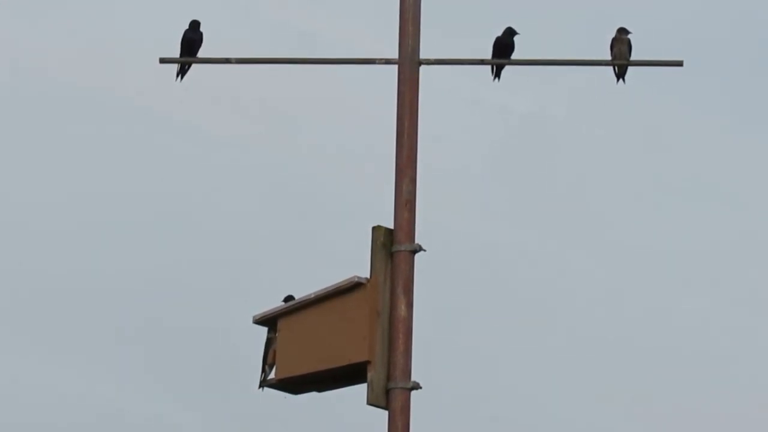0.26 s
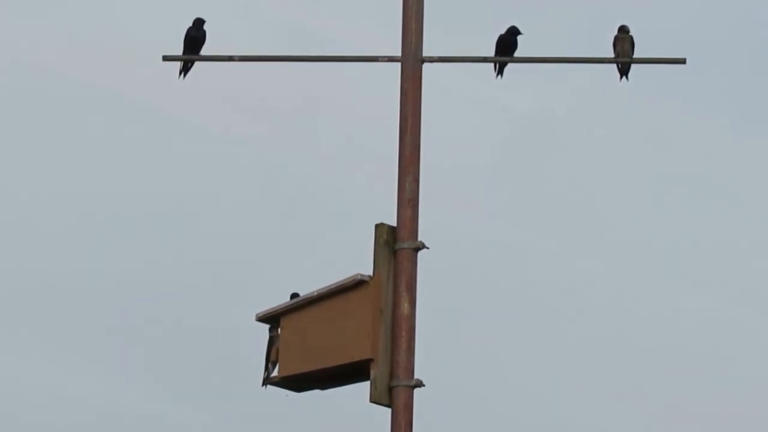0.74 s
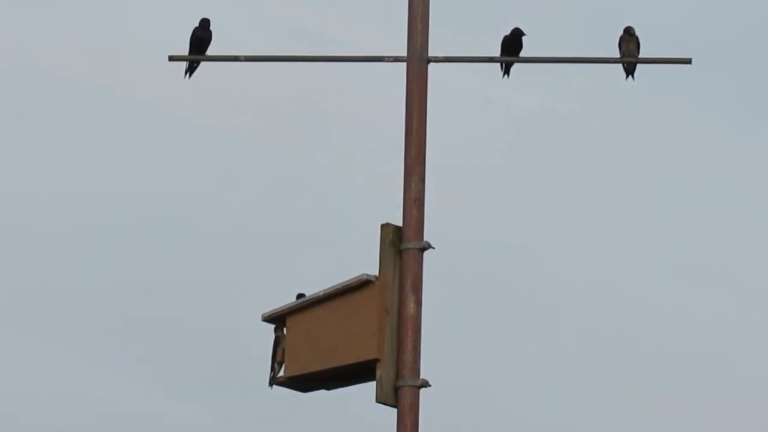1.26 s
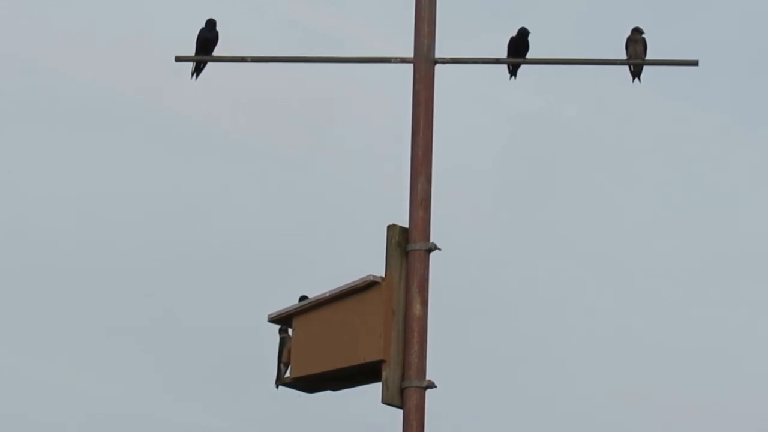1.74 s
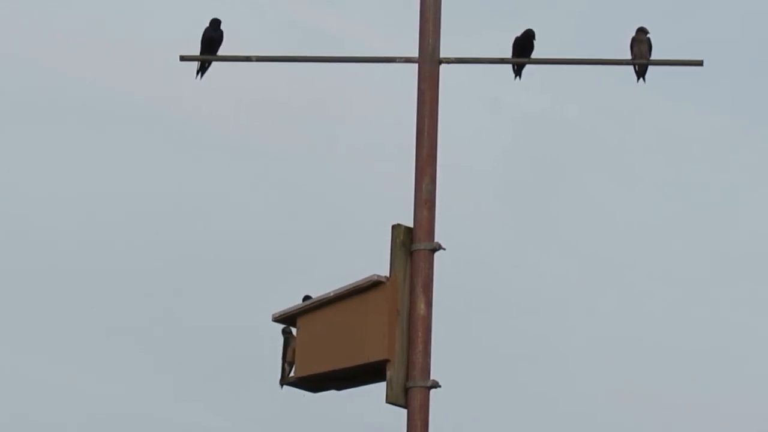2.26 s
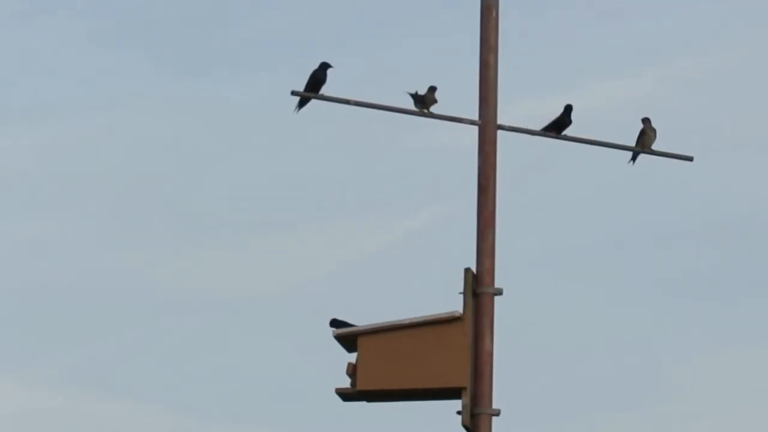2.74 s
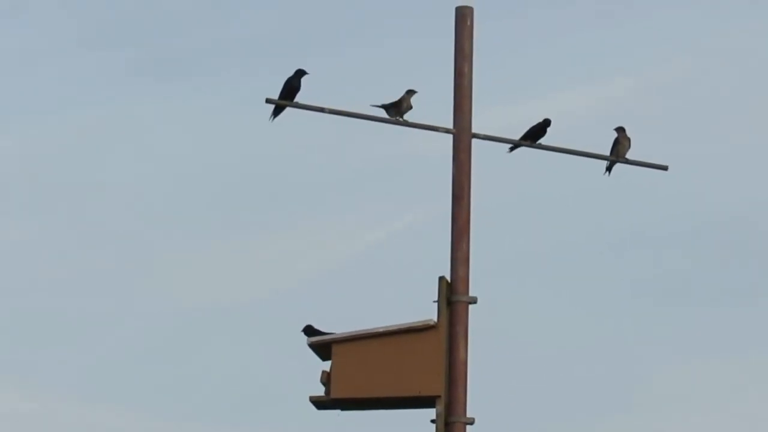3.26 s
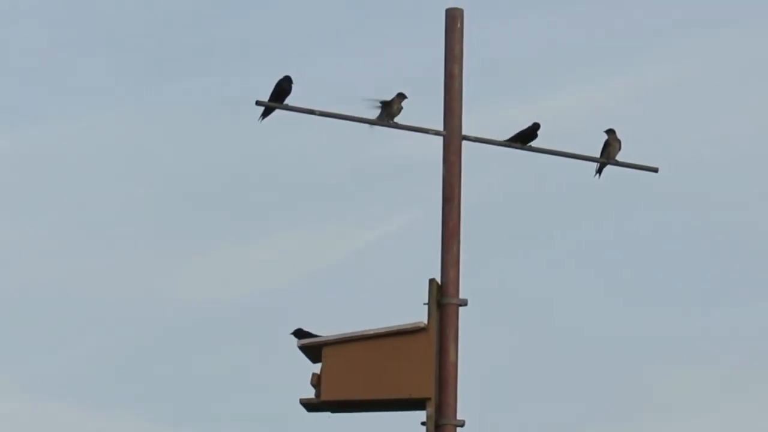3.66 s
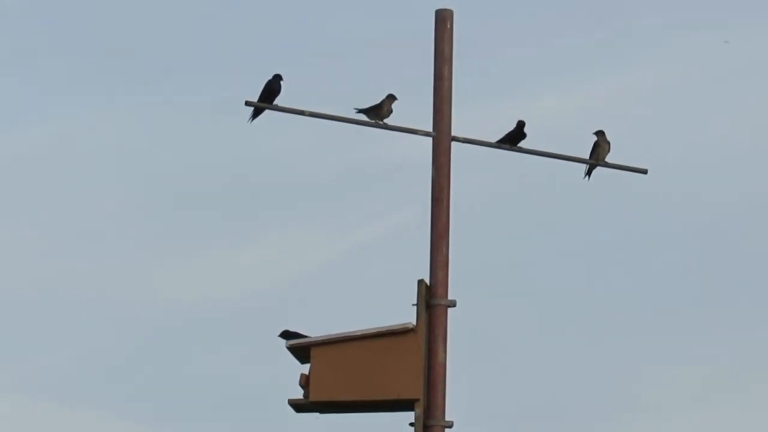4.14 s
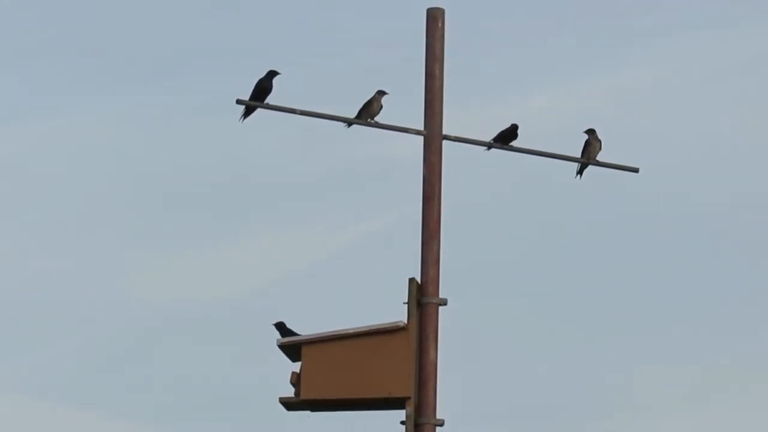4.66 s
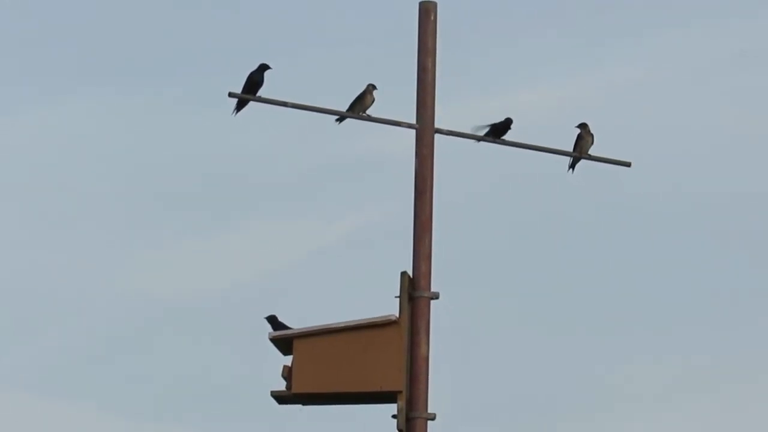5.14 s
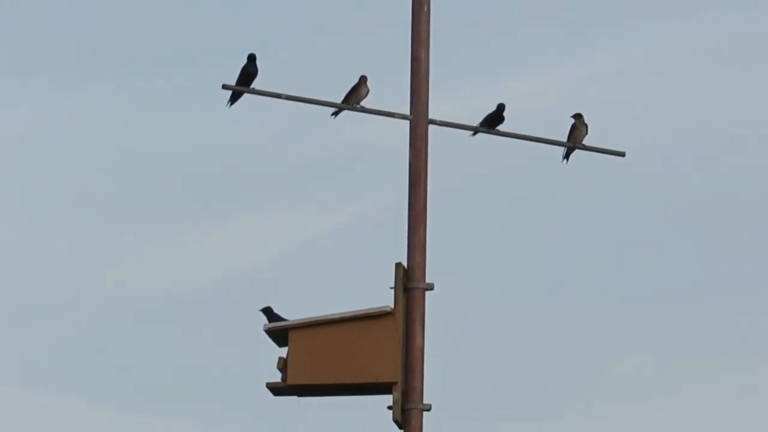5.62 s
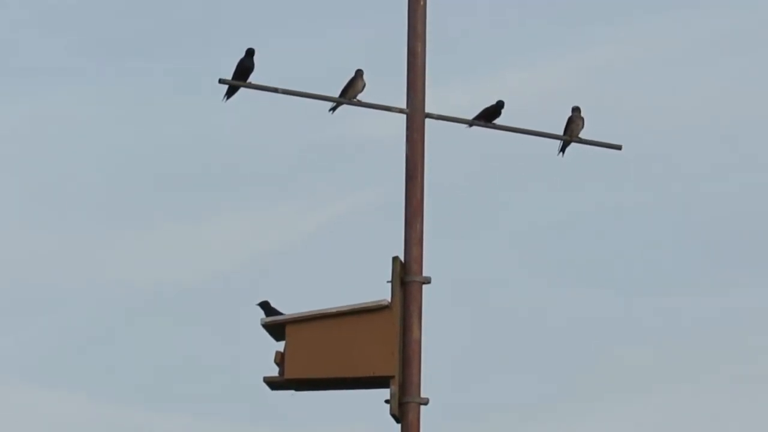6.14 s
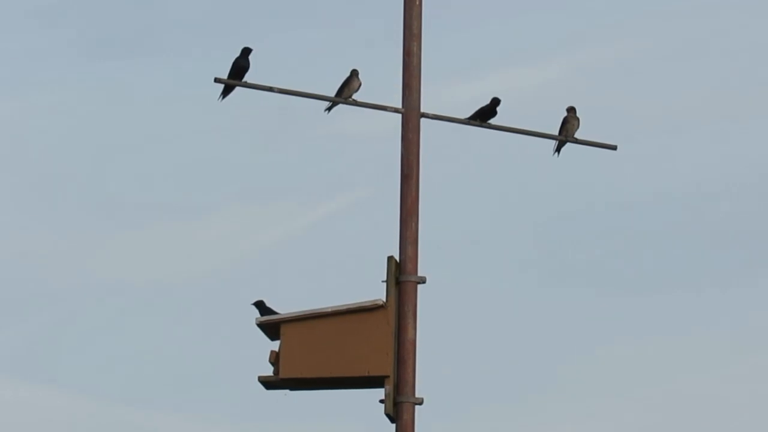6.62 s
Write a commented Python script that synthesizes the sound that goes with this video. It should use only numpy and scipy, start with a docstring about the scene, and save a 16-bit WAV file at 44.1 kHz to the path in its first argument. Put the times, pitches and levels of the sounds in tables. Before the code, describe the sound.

Scattered distant chirps give way to close, buzzy bird chatter and trills, with soft wind and a low drone behind.

```python
"""A colony of martins, each singing a near-sine tone from its syrinx. Wind and a distant drone sound from
the start, with the glides, whistles, twitter and ticks of farther birds. At 2.3 s all sound drops out
briefly. Then near birds on a perch churr in fast falling glides and trill, air hissing through their beaks.
From 3.5 s the colony grows busier with squeaks, rattles, arched calls and chips, and last with rough
falling slides. Ground, boxes and trees reflect the calls as short diffuse tails."""
import sys
import numpy as np
from scipy import signal
from scipy.fft import rfft, irfft, next_fast_len
from scipy.io import wavfile
from scipy.ndimage import uniform_filter1d, map_coordinates

SR = 44100
rng = np.random.default_rng(int(sys.argv[2]) if len(sys.argv) > 2 else 0)


def master(y):
    """Save y as 16-bit WAV."""
    cut = np.clip(np.atleast_2d(y).T, -1, 1)
    pcm = np.round(cut * 32767)  # scale
    wavfile.write(sys.argv[1], SR, pcm.astype(np.int16))


N = 303849
TOP_HZ, NEAR_DB = 15790, -40  # band limit; level above which a glide counts as near


def amp(db):
    """Amplitude ratio of a level in decibels."""
    return 10 ** (np.asarray(db) / 20)


def unit(x):
    """Normalisation to an rms of 1."""
    return x / np.sqrt(np.mean(x ** 2) + 1e-20)


def along(points, hz):
    """Interpolation of (Hz, value) points on a logarithmic frequency axis."""
    knots_hz, values = np.transpose(points)
    return np.interp(np.log(hz + 1), np.log(knots_hz + 1), values)


def wobble(rate, size=N):
    """Band-limited random modulation: a spline over `rate` knots a second."""
    knots = rng.standard_normal(int(size * rate / SR) + 4)
    return map_coordinates(knots, [np.arange(size) * rate / SR], prefilter=False) * np.sqrt(2)


def filtered(x, response):
    """Linear filtering: the spectrum is multiplied by a frequency response."""
    size = next_fast_len(N + 8192)
    return irfft(rfft(x, size) * response(np.fft.rfftfreq(size, 1 / SR)), size)[..., :N]


def add(out, s, sound, pan_db=0):
    """Superposition from second s; pan is the level difference, left minus right."""
    start = max(round(s * SR), 0)
    part = sound[:N - start]
    out[:, start:start + len(part)] += part * amp([[pan_db / 2], [-pan_db / 2]])


def contours(rows):
    """Linear interpolation of a note's breakpoints, and an envelope that softens both ends."""
    s, *columns = np.transpose(rows)
    t = np.arange(s[0], s[-1], 1 / SR)
    edge = np.clip(np.minimum(t - s[0], s[-1] - t) / 0.0014, 0, 1)
    return [np.interp(t, s, column) for column in columns], edge


def noise(spectrum, patchy_db):
    """Partly coherent stereo noise of rms 1, its gain uneven over time and frequency."""
    # Likeness of the channels. Each row: frequency in Hz, left-right correlation.
    coherence = [(60, 0.79), (240, 0.5), (950, -0.11), (3770, -0.18), (15000, 0.14)]

    def mid_side_response(hz):
        """The ratio of mid to side sets the correlation."""
        angle = np.arccos(np.clip(along(coherence, hz), -1, 1)) / 2
        return amp(along(spectrum, hz)) * [np.cos(angle), np.sin(angle)]

    cells = signal.stft(rng.standard_normal((2, N)), nperseg=512)[2]
    patches = uniform_filter1d(uniform_filter1d(rng.standard_normal(cells.shape[1:]), 6, 0), 12, 1)
    pair = signal.istft(cells * amp(patchy_db * unit(patches)), nperseg=512)[1][:, :N]
    mid, side = filtered(pair, mid_side_response)
    return unit(np.array([mid + side, mid - side]))


def wind():
    """Turbulence: three bands of noise, amplitude-modulated by the same gusts."""
    # Wind strength. Each row: time in seconds, then rumble, rush and hiss levels in dB.
    strength = [(0, -53, -53, -58), (.8, -52.5, -52.5, -59.5), (1.5, -52.5, -53.5, -59.5),
                (2.15, -50.5, -51, -58.5), (2.27, -57.5, -45, -51), (2.4, -56.5, -57.5, -62.5),
                (3, -52.5, -55, -61.5), (3.8, -49, -52, -56.5), (4.6, -50, -52.5, -58),
                (5.4, -49.5, -51.5, -57.5), (6.1, -49, -52, -58.5), (6.89, -49, -52.5, -59.5)]
    # Spectra of the three bands. Each row: frequency in Hz, relative spectral density in dB.
    rumble = [(12, -65.5), (20, -29.5), (61, -3.5), (76, -1.5), (91, -1.5), (129, -9.5), (184, -6.5),
              (214, -16.5), (323, -8.5), (400, -13.5), (520, -26), (880, -120)]
    rush = [(120, -65), (200, -3.5), (318, -5.5), (442, -8), (546, 0), (816, -10.5), (1020, -9),
            (1110, -12.5), (1860, -19.5), (2500, -18), (3250, -29.5), (5500, -120)]
    hiss = [(710, -19), (1200, -7), (1860, -2.5), (3010, -1), (3680, -4), (11900, -16), (15400, -20.5)]
    s, *levels = np.transpose(strength)
    rumble_db, rush_db, hiss_db = [np.interp(np.arange(N) / SR, s, db) for db in levels]
    gust = wobble(8)
    out = amp(rumble_db + 1.2 * gust + .8 * wobble(12)) * noise(rumble, patchy_db=1.5)
    out += amp(rush_db + 0.79 * gust) * noise(rush, patchy_db=0.5)
    return out + amp(hiss_db + 0.25 * gust) * noise(hiss, patchy_db=-0.7)


def drone():
    """Narrow-band noise: neighbouring frequencies beat, so the distant hum wavers."""
    # Bands of the hum. Each row: centre in Hz, width in Hz, rms level in dB.
    bands = [(83.7, 12.8, -57.5), (180.4, 6.6, -66.5)]
    out = np.zeros(N)
    for hz, width, db in bands:
        hum = filtered(rng.standard_normal(N), lambda f: np.exp(-((f - hz) / width) ** 2))
        out += amp(db) * unit(hum)
    return out


def air():
    """A level difference between the channels sets wind and drone slightly to the left."""
    # Balance. Each row: frequency in Hz, pan in dB.
    lean = [(60, 1), (950, 1.5), (15000, 0)]
    return filtered(wind() + drone(), lambda hz: amp(along(lean, hz) * np.array([[.5], [-.5]])))


def syrinx(hz, overtones_db, scatter_db=0, breath=0, swell=1):
    """Source and filter: a near-sine tone whose trembling, breathy harmonics are coloured by the beak."""
    # Response of the beak to the overtones. Each row: frequency in Hz, gain in dB.
    beak = [(2500, 25), (4500, -12.5), (7000, -0.5), (9000, 0.5), (11000, -0.5), (13000, -1), (15500, -6)]
    phase = 2 * np.pi * (np.cumsum(hz) / SR + rng.random())
    voice = swell * np.sin(phase)
    for k, db in enumerate(overtones_db, 2):
        gain = amp(db + along(beak, k * hz) + scatter_db * wobble(144, len(hz))) * (k * hz < TOP_HZ)
        voice += gain * (1 + breath * wobble(1800, len(hz))) * np.sin(k * phase)
    return voice


def whistles(warble_hz=95):
    """Held, slightly unsteady tones of farther birds; frequency modulation makes some warble."""
    # Each row: pan in dB, warble deviation in Hz, breakpoints of time in seconds, pitch in Hz, level in dB.
    notes = [(3, 82, [(0, 2520, -53), (.046, 2650, -50), (.07, 2830, -55)]), (5, 101, [(.11, 1990, -53),
             (.17, 2200, -59), (.234, 2255, -51.5), (.29, 2310, -59)]), (3, 80, [(.78, 2476, -57),
             (.836, 2415, -47), (.88, 2130, -53)]), (8.7, -15, [(.885, 1423, -62), (.98, 1480, -53.5),
             (1.11, 1537, -50.5), (1.135, 1370, -62)]), (9.5, 3, [(.94, 4120, -72), (1.05, 4320, -62.5),
             (1.11, 4210, -68), (1.14, 4460, -65)]), (3.5, 0, [(1.195, 3100, -66), (1.228, 3060, -50.5),
             (1.26, 3140, -56)]), (3, 38, [(1.3, 2990, -55), (1.35, 2830, -54), (1.405, 2734, -46.5),
             (1.42, 2800, -60), (1.46, 2780, -66), (1.55, 2800, -68)]), (5, 0, [(1.8, 2480, -46),
             (1.82, 2213, -49), (1.88, 2245, -62), (1.98, 2190, -66)]), (10, 0, [(1.77, 1454, -60),
             (1.85, 1513, -53.5), (1.905, 1560, -55.5), (1.925, 1380, -62)]), (4, 0, [(1.82, 4150, -67),
             (1.9, 4200, -65), (1.95, 4290, -69)]), (16, 0, [(2.655, 2570, -62), (2.67, 2680, -72),
             (2.74, 2570, -65), (2.88, 2320, -66)]), (.5, 2, [(3.12, 1703, -55), (3.17, 1810, -59.5),
             (3.24, 1890, -58.5), (3.33, 1777, -58.5), (3.43, 1695, -59), (3.52, 1760, -54),
             (3.6, 1883, -52), (3.65, 1930, -54)]), (18, 58, [(5.21, 2690, -57.5), (5.3, 2500, -62),
             (5.43, 2270, -64)]), (10, -2, [(5.94, 2710, -51), (5.99, 2740, -55.5), (6.005, 2800, -74.5)]),
             (9, 0, [(6.13, 4340, -60), (6.17, 4520, -64), (6.24, 4500, -56), (6.255, 4521, -71)]),
             (2, 0, [(6.625, 4484, -65), (6.66, 4140, -73), (6.76, 3940, -67)])]
    out = np.zeros((2, N))
    for pan_db, swing_hz, rows in notes:
        (hz, db), edge = contours(rows)
        size = len(hz)
        warble = np.sin(2 * np.pi * warble_hz * np.arange(size) / SR + wobble(28, size))
        pitch = hz * (1 + .004 * wobble(90, size)) + swing_hz * warble
        voice = syrinx(pitch, [-30], scatter_db=2, breath=.3)
        throb_db = wobble(110, size) + swing_hz / 40 * warble
        add(out, rows[0][0], np.sqrt(2) * amp(db + throb_db) * edge * voice, pan_db)
    return out


def glide(out, s, length, from_hz, to_hz, db, pan_db):
    """A linear frequency sweep centred on second s, under a bell of breath pressure."""
    # Relative levels in dB of harmonics 2, 3, .. before the beak colours them.
    harmonics = [-24, -40, -39, -43, -48, -46]
    size = round(2 * length * SR)
    progress = np.arange(size) / (length * SR) - .5
    bell = np.sin(np.pi * np.clip(progress, 0, 1) ** 1.15) ** 1.4 * amp(.8 * wobble(200, size))
    skirt = amp(-14) * np.hanning(size) * (1 + .6 * wobble(900, size))  # raspy lead-in and run-out
    overtones = harmonics if db > NEAR_DB else harmonics[:1]  # distance hides the high ones
    hz = np.maximum(from_hz + (to_hz - from_hz) * progress, 1000)
    voice = syrinx(hz, overtones, scatter_db=3, breath=.35)
    rasp = 1 + .12 * wobble(900, size)
    add(out, s - length, amp(db) * (bell * rasp + skirt) * voice, pan_db)


def single_calls():
    """Lone frequency sweeps that stand out from the colony, as notes for glide()."""
    # Each row: middle and length in seconds, first and last pitch in Hz, level in dB, pan in dB.
    notes = [(.011, 0.015, 1980, 1370, -53, 3), (.043, .028, 1800, 1520, -56, 2),
             (.056, 0.032, 4200, 4080, -59, 12), (.331, 0.03, 3220, 3300, -55.5, 16),
             (.345, 0.024, 2990, 3630, -51, 18.5), (.361, .018, 3700, 2690, -48.5, 16),
             (.405, 0.02, 2500, 3500, -56, 10), (.47, 0.055, 4600, 3200, -78, 2),
             (.55, 0.035, 2750, 1540, -58, 3), (.645, 0.012, 3100, 2090, -52, 5),
             (.79, .03, 4590, 4720, -60.5, 10), (.377, 0.038, 2920, 3900, -55, 13),
             (.694, .028, 3330, 2960, -54, 6), (.706, .022, 1890, 1680, -51, 1),
             (.714, 0.018, 3280, 2120, -47, 3), (.749, 0.033, 2890, 2010, -52, 6),
             (.769, 0.041, 3930, 1410, -54.5, 15), (.826, 0.024, 2784, 2190, -49, 10),
             (.952, 0.046, 2010, 1200, -57, 9), (1.262, 0.012, 3420, 2380, -50, 1),
             (1.271, .016, 1870, 3180, -46, 3), (1.288, 0.0075, 3250, 2720, -47, 1),
             (1.644, .03, 2450, 2120, -63, 8), (1.7, 0.041, 3330, 3150, -62, 9),
             (1.72, .09, 3800, 4020, -67, 9), (2.19, .04, 2900, 3530, -66, 6),
             (1.766, 0.034, 3520, 2890, -56.5, 18), (1.79, 0.029, 3040, 2770, -48, 2),
             (2.275, 0.015, 2010, 4340, -48, 4), (2.97, 0.023, 1990, 1230, -54.5, 0),
             (2.992, 0.016, 2015, 1280, -57, 0), (3.019, .02, 2000, 1250, -56.5, 0),
             (3.17, 0.021, 3540, 3900, -53, 8), (3.184, .011, 3730, 3100, -52, 7),
             (3.569, 0.024, 3600, 2280, -44.5, 0), (3.617, .03, 3490, 2680, -58, 0),
             (3.797, 0.02, 3660, 2800, -47.5, -1.5), (3.888, .01, 5170, 4750, -44, -2.5),
             (4.234, 0.012, 1950, 1770, -40.5, 1), (4.295, .013, 2315, 3180, -46, -2),
             (4.321, .013, 3530, 3210, -50, -7), (4.7, .046, 3360, 3340, -57, 15),
             (4.77, 0.061, 3260, 3470, -55, 8), (5.082, 0.015, 2110, 1660, -47, -2),
             (5.094, .015, 1650, 1450, -52, 0), (5.122, .024, 3500, 3030, -55, 1),
             (5.128, 0.024, 1640, 1520, -56, 0), (5.107, 0.019, 2200, 1580, -55, -2),
             (5.298, 0.01, 2006, 1740, -48, -2), (5.308, 0.0255, 3880, 2620, -54, 3),
             (5.277, 0.026, 4200, 5850, -57, -5), (5.311, 0.018, 1620, 1440, -53, 1),
             (5.425, 0.016, 2970, 2410, -44.5, -7), (5.528, .025, 6300, 6750, -61, 0),
             (5.746, 0.01, 2343, 1050, -39.5, -1), (5.825, .042, 2980, 3100, -56.5, 9.5),
             (5.858, .032, 2370, 3140, -50.5, 11), (5.985, .045, 4250, 5030, -68, -4),
             (6.024, .028, 6070, 6680, -61, -1), (6.085, 0.027, 2790, 2490, -61, 12),
             (6.21, .03, 4470, 2220, -56, 5), (6.226, .044, 2700, 2200, -60, 5),
             (6.293, 0.079, 3090, 4050, -57.5, -2), (6.301, 0.024, 3180, 1400, -54.5, 7),
             (6.331, 0.064, 2330, 1440, -57, 3), (6.389, 0.064, 2460, 3140, -55.5, 11),
             (6.429, .056, 3110, 2410, -60, 14), (6.558, .049, 3000, 2820, -59, 15),
             (6.768, 0.048, 3060, 2080, -56, 2)]
    return notes


def twitter(start, end, count):
    """A random point process: faint glides of far birds, most of them falling."""
    out = np.zeros((2, N))
    for when, span, pitch, slope, level, side in rng.random((count, 6)):
        s, length = start + when * (end - start), 0.0062 + .035 * span
        hz = 2100 * 2.4 ** pitch
        step = hz * .4 * (slope - .65)
        glide(out, s, length, hz - step, hz + step, db=-70 + 8 * level, pan_db=12 * (side - .5))
    return out


def repeated(calls, shape, pitch_spread=.015):
    """Transposition: one pattern of glides recurs, all its frequencies scaled by a random ratio."""
    # Each row of shape: delay and length in seconds, first and last pitch in Hz, gain in dB, pan in dB.
    notes = []
    for s, db in calls:
        ratio = 1 + pitch_spread * rng.standard_normal()
        notes += [(s + delay, length, ratio * from_hz, ratio * to_hz, db + gain_db, pan_db)
                  for delay, length, from_hz, to_hz, gain_db, pan_db in shape]
    return notes


def ticks():
    """Temporal fusion: brief overlapping sweeps of a bird on the left are heard as one tick."""
    # Each row: time in seconds, level in dB.
    calls = [(.095, -45), (.232, -47), (.359, -47.5), (.523, -52.5), (.658, -49), (.812, -51.5),
             (2.259, -48.5)]
    # The glides of one tick, with columns as in repeated().
    shape = [(0, .008, 3500, 3050, -5.5, 18), (-0.0093, .009, 3920, 5180, -10, 14),
             (-.004, 0.022, 5950, 6480, -15, 13), (.013, .012, 3450, 3520, -12, 23)]
    return repeated(calls, shape)


def churrs():
    """A pulse train from the perch: each syllable sweeps down, then a low note follows and drops away."""
    # Each row: middle and length in seconds, top and end pitch in Hz, sweep and low-note levels in dB.
    syllables = [(2.413, 0.0058, 3000, 1740, -26.5, -43.5), (2.434, 0.012, 3000, 1710, -29.5, -42),
                 (2.453, 0.014, 3200, 1800, -28.5, -35.5), (2.477, .013, 2700, 2290, -28, -37),
                 (2.497, 0.018, 2750, 1940, -29, -35.5), (2.51, 0.014, 2700, 2030, -29.5, -40),
                 (2.534, 0.019, 2700, 1920, -29, -37), (2.565, 0.021, 2414, 2020, -32, -39),
                 (3.349, 0.0069, 3370, 2260, -25.5, -38), (3.368, 0.011, 3350, 1950, -24, -42),
                 (3.387, .017, 3200, 1990, -20, -34), (3.415, 0.022, 3050, 2230, -22.5, -31.5),
                 (3.444, 0.025, 2770, 2200, -23.5, -46), (3.685, 0.028, 3670, 1977, -17.5, -44),
                 (3.711, 0.029, 3650, 1906, -17, -30), (3.745, .028, 2650, 1800, -30, -55.5),
                 (3.763, 0.027, 3400, 2300, -33, -53), (3.784, 0.017, 3150, 1600, -38.5, -42),
                 (3.817, 0.028, 2670, 1780, -41.5, -40.5), (3.846, .013, 2910, 1920, -43, -55),
                 (3.939, .0078, 3625, 1940, -23.5, -36), (3.957, 0.016, 3700, 1760, -24, -44),
                 (3.975, .013, 3380, 1910, -21, -31), (3.996, .012, 3074, 2000, -21.5, -35),
                 (4.018, 0.022, 3015, 2080, -23, -33.5), (4.042, 0.012, 2655, 2240, -26.5, -53),
                 (4.068, .019, 2550, 1540, -47, -48), (4.093, 0.029, 2730, 1440, -46.5, -50),
                 (4.167, 0.034, 3350, 2000, -36, -44), (4.191, .027, 2520, 1580, -40, -56),
                 (4.208, 0.011, 2380, 1950, -40, -38.5), (4.825, 0.0056, 2680, 1810, -34, -40),
                 (4.843, 0.0084, 2660, 1850, -28.5, -35), (4.863, 0.017, 2670, 2050, -28.5, -34),
                 (4.889, .02, 2490, 2020, -29.5, -35.5), (4.917, 0.016, 2410, 2020, -27.5, -43.5),
                 (5.045, .027, 3500, 2240, -40, -51), (5.09, .018, 3680, 2800, -48, -56),
                 (5.263, .034, 4290, 1750, -42.5, -54), (5.755, 0.0084, 3340, 1690, -29, -38),
                 (5.776, .012, 3110, 2020, -27.5, -37.5), (5.802, .0098, 2890, 1580, -36, -57.5),
                 (5.884, .01, 3350, 2050, -28.5, -36.5), (5.905, 0.011, 3394, 1960, -25, -34),
                 (5.927, 0.0097, 3175, 1840, -25, -39.5), (5.948, 0.0055, 2790, 1530, -35, -62)]
    low_hz, knee_hz, drop_hz, drop_length = 2200, 1683, 1253, .01
    notes = []
    for s, length, top_hz, end_hz, db, low_db in syllables:
        low_length = .45 * length + .006
        low_s = s + length / 2 + .3 * low_length
        drop_s = low_s + low_length / 2
        notes += [(s, length, top_hz, end_hz, db, 0),
                  (low_s, low_length, low_hz, knee_hz, low_db, 0),
                  (drop_s, drop_length, knee_hz, drop_hz, low_db - 9, 0),
                  (drop_s, drop_length, 2 * knee_hz, 2 * drop_hz, low_db - 6.5, 0)]  # octave of the drop
    return notes


def sheen():
    """Turbulent flow: air rushes through the beak in uneven puffs, high above the near calls."""
    # Each row: start and end in seconds, centre frequency in Hz, level in dB.
    puffs = [(2.45, 2.59, 14500, -69), (2.74, 2.81, 14500, -68), (3.364, 3.47, 12000, -71),
             (3.657, 3.75, 12400, -52), (3.927, 4.051, 12300, -53), (4.215, 4.285, 14500, -62),
             (4.823, 4.93, 14100, -62), (5.739, 5.8, 12800, -62), (5.871, 5.95, 12600, -58)]
    out = np.zeros((2, N))
    for start, end, hz, db in puffs:
        size = round((end - start) * SR)
        f = np.fft.rfftfreq(size, 1 / SR)
        colour = np.exp(-((f - hz) / 1200) ** 2) + .35 * (f > 4500)
        hiss = unit(irfft(rfft(rng.standard_normal(size)) * colour, size))
        add(out, start, amp(db + 4 * wobble(90, size)) * np.hanning(size) ** .3 * hiss)
    return out


def trills(swing_hz=240):
    """Coupled frequency and amplitude modulation: the voice is loudest where its fluttering pitch dips."""
    # One list a trill. Each row: time in seconds, middle pitch in Hz, level in dB, flutter rate in Hz.
    calls = [
        [(2.7405, 3600, -39, 135), (2.76, 3640, -29, 125), (2.776, 3280, -21, 118.6), (2.794, 2905, -34, 106.4),
         (2.813, 1780, -34, 97)],
        [(3.633, 3565, -49, 126), (3.645, 3650, -25.5, 126), (3.66, 3550, -20.5, 123), (3.68, 3250, -15, 127)],
        [(4.208, 3660, -41.5, 128), (4.228, 3730, -21, 124.7), (4.244, 3380, -18.5, 120),
         (4.26, 3130, -16, 119.5), (4.278, 2560, -26, 110), (4.291, 1880, -41, 108)],
    ]
    # Relative levels in dB of harmonics 2, 3, .. before the beak colours them.
    harmonics = [-26, -38.5, -36.5]
    out = np.zeros((2, N))
    for rows in calls:
        (hz, db, flutter_hz), edge = contours(rows)
        phase = np.pi + 2 * np.pi * np.cumsum(flutter_hz) / SR  # starts at the top of a flutter
        swell = 0.61 + 0.33 * np.cos(phase + 0.6) + 0.18 * np.cos(2 * phase + .1)
        voice = syrinx(hz - swing_hz * np.cos(phase), harmonics, scatter_db=4.5, breath=0.36, swell=swell)
        add(out, rows[0][0], amp(db) * edge * voice)
    return out


def squeaks(length_s=.015, fall_ratio=.74):
    """Short downward sweeps at high frequency, heard as thin squeaks."""
    # Each row: middle in seconds, top pitch in Hz, level in dB.
    calls = [(3.563, 7480, -58.5), (3.577, 8600, -56.5), (3.588, 7850, -59), (3.787, 8500, -60),
             (4.586, 7050, -52), (4.601, 8440, -54), (4.984, 8450, -58), (5.039, 7100, -56),
             (5.054, 9200, -57), (5.085, 8060, -67), (5.113, 8790, -60), (5.26, 7500, -55.5),
             (5.273, 8710, -61)]
    return [(s, length_s, hz, fall_ratio * hz, db, 0) for s, hz, db in calls]


def rattles():
    """Click trains on the right: rapid sweeps of scattered pitch merge into a dry rattle."""
    # Each row: first click in seconds, number of clicks, spacing in seconds, level in dB.
    trains = [(3.876, 6, .012, -46), (4.587, 3, .012, -44), (5.443, 3, .011, -46)]
    # The glides of one click, with columns as in repeated().
    shape = [(0, .011, 4500, 3000, -1.5, -6), (0, .01, 2578, 1760, -0.52, -2)]
    clicks = [(s + k * gap, db) for s, count, gap, db in trains for k in range(count)]
    return repeated(clicks, shape, pitch_spread=.1)


def arches(rise_s=.011, fall_s=.015, pan_db=-9):
    """A rising sweep joined to a falling one makes the arched call of a bird on the right."""
    # Each row: time of the top in seconds, top pitch in Hz, level in dB.
    calls = [(4.151, 5600, -57.5), (4.352, 5150, -58), (4.458, 4800, -59), (4.548, 5390, -54.5),
             (4.753, 5500, -60), (4.791, 5970, -56), (5.025, 5400, -59), (5.157, 6100, -56),
             (5.406, 4700, -62)]
    notes = []
    for s, top_hz, db in calls:
        notes += [(s - rise_s / 2, rise_s, .86 * top_hz, top_hz, db, pan_db),
                  (s + fall_s / 2, fall_s, top_hz, .69 * top_hz, db - 1.5, pan_db)]
    return notes


def chips():
    """A steady chip-and-chew: three nearly harmonic partials rise together, then lower sweeps fall."""
    # Each row: time in seconds, level in dB.
    calls = [(4.312, -53), (4.428, -50), (4.552, -52), (4.669, -52), (4.794, -51.5), (4.918, -51),
             (5.053, -55.5), (5.194, -59), (5.343, -56)]
    # The glides of one call, with columns as in repeated().
    shape = [(0, .028, 3970, 4560, 0, 3), (0, 0.019, 6120, 6600, -10.5, -3), (0, .025, 2020, 2250, -9, 4),
             (0.013, .01, 3600, 2500, 0, 1.5), (.027, .017, 2680, 2660, 0.5, 4),
             (.046, .036, 2280, 2060, 0.5, 2)]
    return repeated(calls, shape)


def slides(flutter_hz=191, swing_hz=450):
    """Roughness from fast frequency modulation: long falls on the right that steady on the way down."""
    # Each row: start and length in seconds, first and last pitch in Hz, level in dB.
    calls = [(5.36, 0.047, 5740, 4040, -56), (5.582, 0.075, 6380, 2880, -56),
             (5.834, 0.069, 6300, 3240, -56.5), (6.089, 0.065, 6170, 3000, -54)]
    out = np.zeros((2, N))
    for s, length, from_hz, to_hz, db in calls:
        size = round(length * SR)
        progress = np.arange(size) / (length * SR)
        flutter = np.sin(2 * np.pi * flutter_hz * length * progress + wobble(58, size))
        hz = from_hz + (to_hz - from_hz) * progress + swing_hz * (1 - progress) * flutter
        voice = syrinx(hz, overtones_db=[])
        envelope = amp(db + 2 * wobble(193, size)) * np.sin(np.pi * progress) ** 0.65
        add(out, s, envelope * voice, pan_db=-9)
    return out


def chatter():
    """Level as a cue to distance: loud glides belong to the perch, soft ones to farther birds."""
    near, far = np.zeros((2, 2, N))
    for note in single_calls() + churrs() + arches() + squeaks() + ticks() + chips() + rattles():
        db = note[4]
        glide(near if db > NEAR_DB else far, *note)
    return near, far


def echoes(x, t60):
    """Diffuse reflection from ground, boxes and trees: a tail that decays 60 dB in t60 seconds."""
    t = np.arange(SR // 4) / SR
    tail = rng.standard_normal((2, len(t))) * amp(-60 * t / t60) * (t > .003)
    return signal.fftconvolve(x, tail / np.linalg.norm(tail[0]), axes=1)[:, :N]


def scene():
    """Superposition of birds, echoes and air; the far calls carry more reflected sound."""
    near, far = chatter()
    clear = near + trills() + sheen() + whistles()
    far = far + slides() + twitter(0, N / SR, count=150)
    far += amp(5.5) * twitter(3.8, 5.5, count=110)  # the colony is busiest after the loudest calls
    far += amp(3.0) * twitter(0, 2.27, count=50)
    clear += amp(-11.0) * echoes(clear, t60=0.11)
    return clear + far + amp(-4) * echoes(far, t60=0.16) + air()


def record(dry):
    """Gating and band limiting: the sound drops out briefly, and a steep low-pass cuts the top."""
    stop_s, resume_s, ramp_s = 2.275, 2.394, 0.00085
    t = np.arange(N) / SR
    gate = np.clip(np.maximum(stop_s - t, t - resume_s) / ramp_s, 0, 1)
    return filtered(dry * gate, lambda hz: 1 / (1 + (hz / TOP_HZ) ** 1200))


dry = scene()
out = record(dry)
master(out)
```